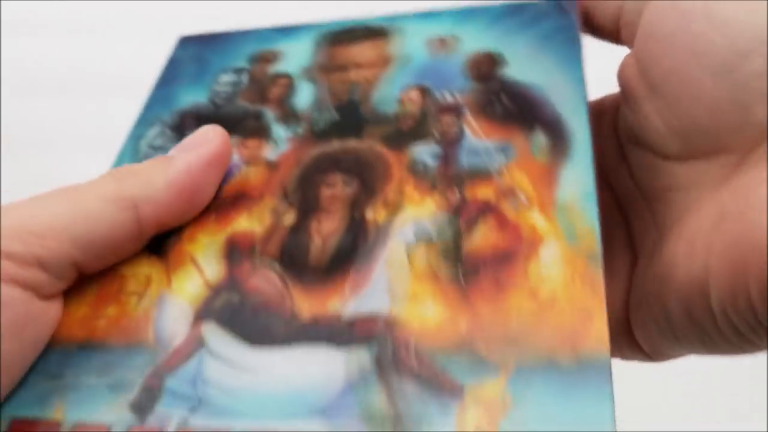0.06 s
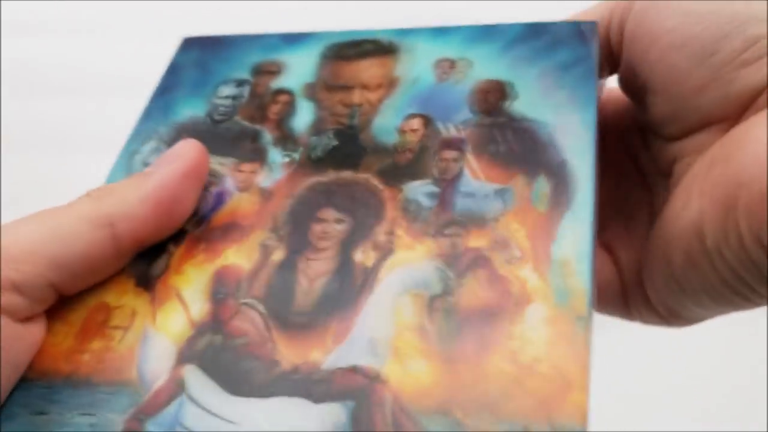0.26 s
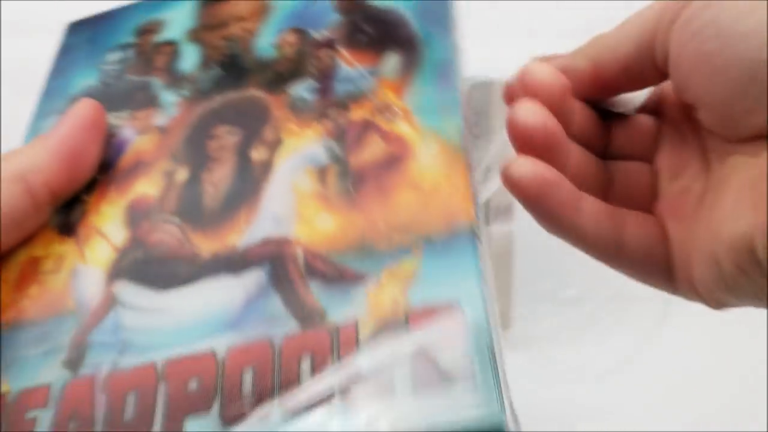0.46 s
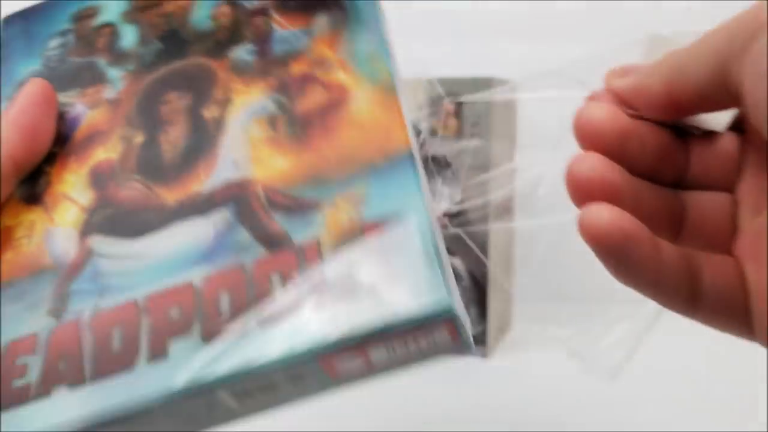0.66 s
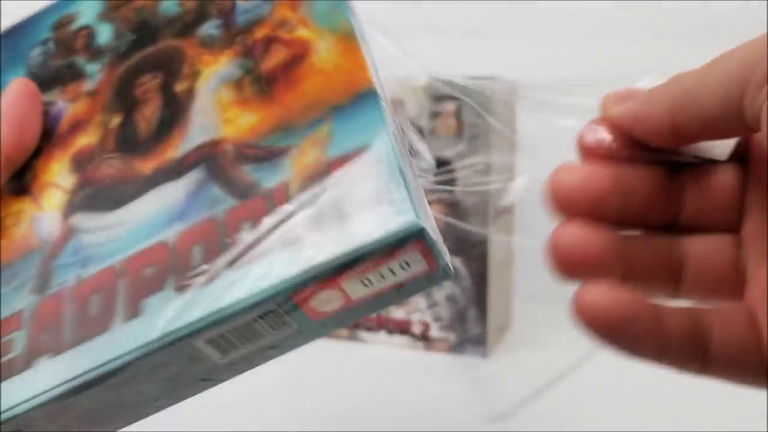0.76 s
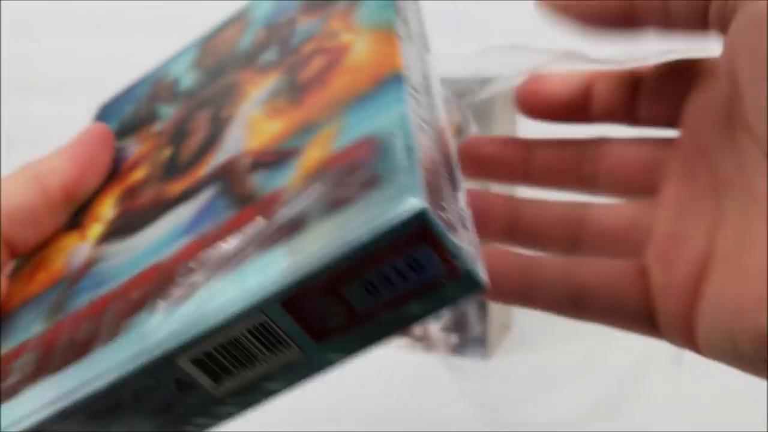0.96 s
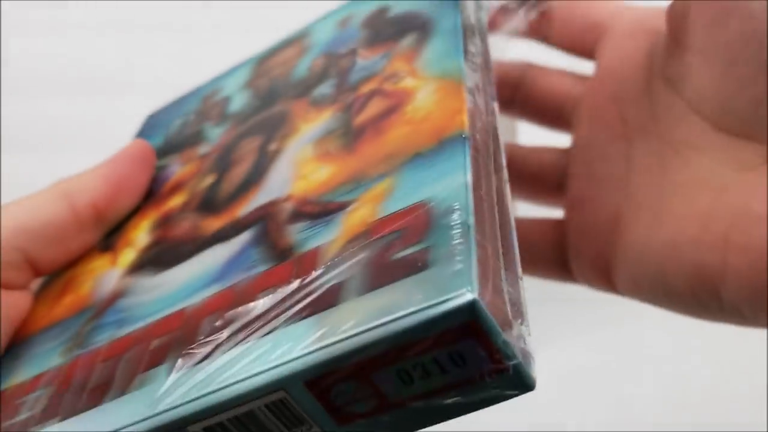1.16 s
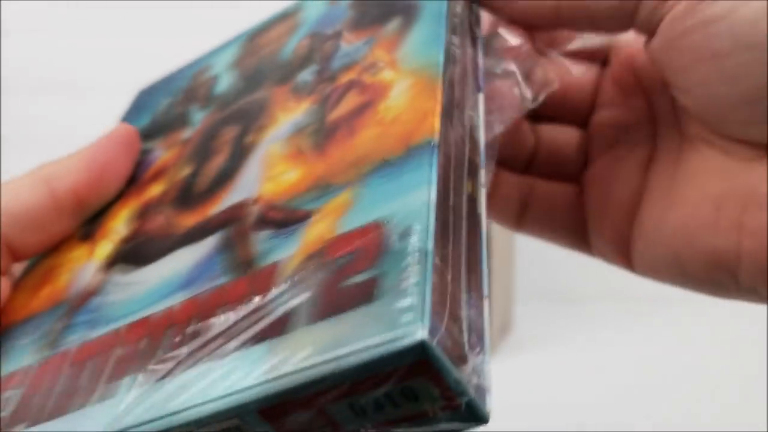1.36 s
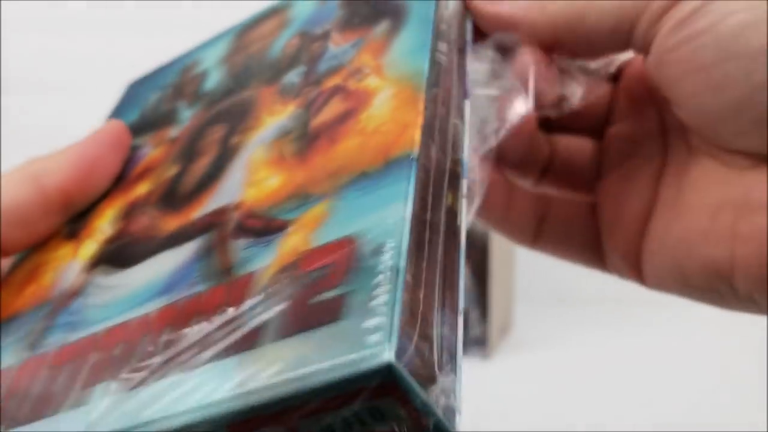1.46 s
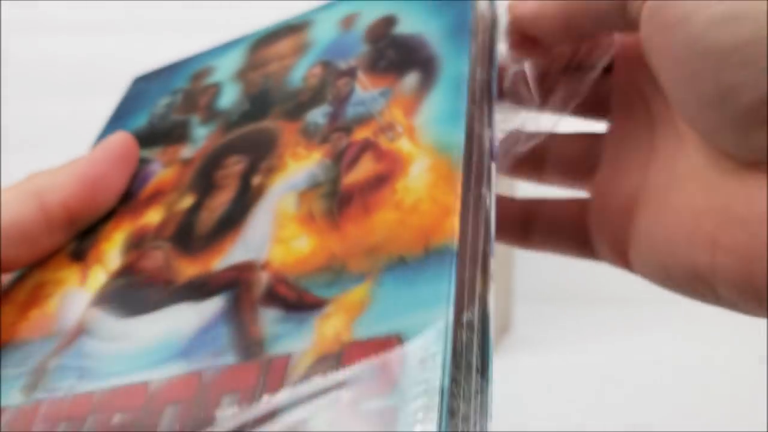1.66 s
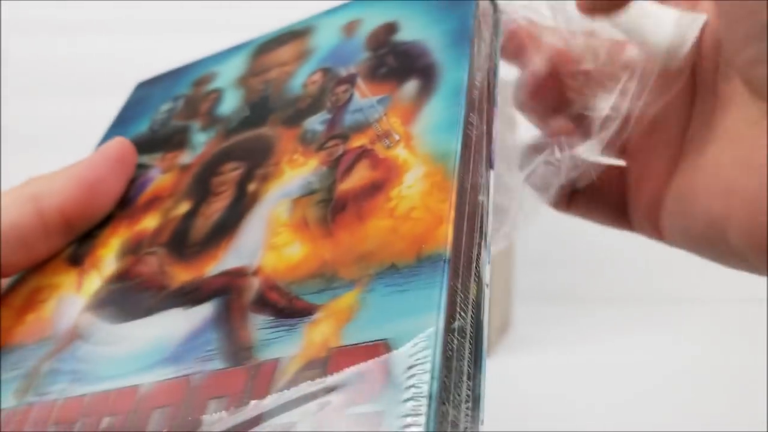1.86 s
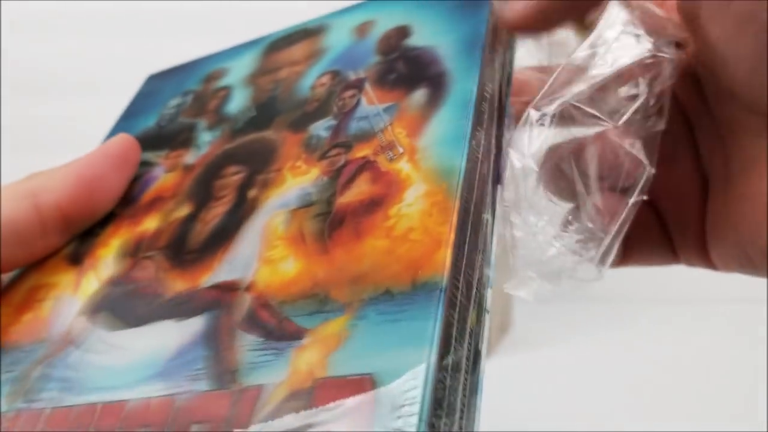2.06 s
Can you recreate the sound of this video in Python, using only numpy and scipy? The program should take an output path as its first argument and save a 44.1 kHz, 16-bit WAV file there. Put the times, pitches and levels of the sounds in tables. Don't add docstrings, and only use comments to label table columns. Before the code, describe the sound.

Thin plastic wrap is peeled from a cardboard box, close in stereo in a small room. Crisp crinkles and ticks grow until 0.33 s; a hard rip crackles at 0.35-0.46 s, then low finger rubbing, and a second, sharper rip at 0.63-0.71 s knocks the box. Sparse, quieter ticks follow until 1.25 s, then livelier snapping peels, with a soft lull near 1.5-1.6 s, continue to 2.1 s over faint hum.

```python
import sys
import numpy as np
from scipy import signal
from scipy.fft import rfft, irfft, next_fast_len
from scipy.io import wavfile
from scipy.ndimage import map_coordinates

SR = 44100
rng = np.random.default_rng(int(sys.argv[2]) if len(sys.argv) > 2 else 0)


def wav_record(signal):
    frames = np.transpose(np.atleast_2d(signal))
    bounded = np.clip(frames, -1, 1)
    quanta = np.round(bounded * 32767).astype(np.int16)
    wavfile.write(sys.argv[1], SR, quanta)


def nominal_scale(level):
    x = np.asarray(level, float) / 20
    return 10 ** x


N = 92610

# (time [s], crinkle level [dB], box drumming over it [dB])
HAND = [(0, -50.5, -37), (.09, -51, -16.5), (.15, -49, -9), (0.301, -43.5, -10), (.5, -60, 12.5),
        (.57, -59.5, -20), (.8, -55, -26), (.9, -58.5, -11), (1.02, -66.5, -14), (1.231, -59.5, -38),
        (1.303, -42.5, -7.5), (1.45, -46.5, -13), (1.562, -63.5, -40), (1.664, -39.5, -15),
        (1.76, -44.5, -9.5), (1.951, -47, -7), (2.02, -57, -14.5), (2.09, -40, -14.5)]
SNAP_T60, SNAP_DB, RING_DB = 0.0089, -7, 4
RISE_S = .0003


def unit(x):
    return x / np.sqrt(np.mean(x ** 2) + 1e-20)


def along(points, hz):
    f, v = np.transpose(points)
    return np.interp(np.log(hz + 1), np.log(f + 1), v)


def filtered(x, response):
    m = next_fast_len(N + 8192)
    hz = np.fft.rfftfreq(m, 1 / SR)
    return irfft(rfft(x, m) * response(hz), m)[..., :N]


def peak(f, hz, width):
    return 1j * f * width / (hz * hz - f * f + 1j * f * width + 1e-9)


def causal(points):
    def response(f):
        cepstrum = irfft(np.log(nominal_scale(along(points, f)) + 1e-6))
        place = np.arange(len(cepstrum))
        fold = np.where(place < len(cepstrum) // 2, 2., 0.) - (place == 0)
        gain = np.exp(rfft(cepstrum * fold))
        return gain / np.sqrt(np.mean(np.abs(gain) ** 2))
    return response


def hum():
    # (frequency [Hz], density [dB per Hz])
    hum_colour = [(12, -23), (20, 4), (116, 2.5), (1030, -24.5), (3840, -2.5), (8890, -18.5), (12100, -13),
                  (16000, -15)]
    noise = rng.standard_normal((2, N))
    return nominal_scale(-70) * unit(filtered(noise, lambda hz: nominal_scale(along(hum_colour, hz))))


def grip():
    # (frequency [Hz], density [dB per Hz])
    grip_colour = [(25, -6), (75, 9.5), (200, 4), (400, -45), (1200, -42)]
    # (time [s], push [dB])
    grip_push = [(0, -73.5), (.41, -75), (.46, -59), (.55, -63.5), (.62, -58), (.75, -64), (.81, -82),
                 (1.24, -80), (1.34, -62), (1.56, -84.5), (1.72, -65), (2.1, -72.5)]
    t = np.arange(N) / SR
    uneven_db = 3 * map_coordinates(rng.standard_normal(80), [t * 30])
    lumps = nominal_scale(np.interp(t, *np.transpose(grip_push)) + uneven_db)
    noise = rng.standard_normal((2, N))
    return nominal_scale(-1) * lumps * unit(filtered(noise, lambda hz: nominal_scale(along(grip_colour, hz))))


def taps():
    # (time [s], peak level [dB], frequency [Hz])
    knocks = [
        (1.698, -48.5, 261),
    ]
    t = np.arange(N) / SR
    out = np.zeros(N)
    for s, db, hz in knocks:
        since = np.maximum(t - s, 0)
        envelope = since * hz * np.exp(1 - since * hz)
        out += nominal_scale(db) * envelope * np.sin(2 * np.pi * hz * since)
    return out


def buckles(rows, t60, ring_db, rise_s, size, kick_db=-40):
    # (frequency [Hz], density [dB per Hz])
    film_colour = [(240, -63), (400, -16.5), (687, -11), (1350, -8.5), (2550, -4), (3530, -2.5),
                   (16000, -2)]
    # (frequency [Hz], width [Hz], level [dB])
    box_modes = [(228, 127, -8.5), (641, 172, -2.5), (1300, 2700, -12.5)]
    ring_q, box_low_hz = 5.4, 124
    ports_apart = np.array([[1], [1j]])

    s, db, hz, box_db = np.transpose(rows)
    draw = rng.standard_normal((len(s), 2, size + 1))
    noise, sign = draw[..., 1:], np.sign(draw[..., :1])
    t, f = np.arange(size) / SR, np.fft.rfftfreq(2 * size, 1 / SR)

    fade_s = t60 * np.exp(0.19 * draw[:, :1, :1])
    shape = nominal_scale(-60 * t / fade_s) * (1 - np.exp(-(t + 1 / SR) / rise_s))
    strength = np.linalg.norm(shape, axis=2, keepdims=True)

    pitch = hz[:, None]
    ring = 1 + nominal_scale(ring_db) * np.sqrt(5000 / pitch) * peak(f, pitch, pitch / ring_q)
    ring = ring[:, None]
    kick = nominal_scale(kick_db) * strength * sign * np.exp(-2j * np.pi * f * rise_s) * ports_apart
    rung = irfft(rfft(noise * shape, 2 * size) * ring + kick * (ring - 1))[..., :size]
    rung = rung * strength / np.linalg.norm(rung, axis=2, keepdims=True)
    push = 0.22 * noise * shape + 3 * sign * np.exp(-t / .00008)

    start = np.clip(np.round(s * SR), 0, N).astype(int)
    at = (start[:, None] + np.arange(size)).ravel()

    def lay(bursts, gain):
        sized = bursts * gain[:, None, None]
        return np.array([np.bincount(at, sized[:, c].ravel(), N + size)[:N] for c in range(2)])

    def drum(f):
        panels = sum((-1) ** k * nominal_scale(d) * peak(f, c, w) for k, (c, w, d) in enumerate(box_modes))
        return ports_apart * (1j * f / (box_low_hz + 1j * f)) ** 2 * panels

    film = filtered(lay(rung, nominal_scale(db)), causal(film_colour))
    return film + filtered(lay(push, nominal_scale(db + box_db)), drum)


def grains(curve, count, spread_db, clump_db, t60):
    s, db, box_db = np.transpose(curve)
    span = s[-1] - s[0]
    u = rng.random((count, 3))
    at = s[0] + span * u[:, 0]
    clump = map_coordinates(rng.standard_normal(200), [at * 60])
    size_db = -spread_db * np.log(u[:, 1] + .004) + clump_db * clump
    size_db = size_db - 10 * np.log10(np.mean(nominal_scale(2 * size_db)) * count / span * t60 / 14)
    pitch = 1500 * 9 ** u[:, 2]
    rows = np.transpose([at, np.interp(at, s, db) + size_db, pitch, np.interp(at, s, box_db)])
    return buckles(rows, t60, ring_db=4.5, rise_s=0.00019, size=160)


def crinkle():
    return grains(HAND, count=6000, spread_db=2.4, clump_db=1.6, t60=.0025)


def followers(snaps, count):
    follow_s, follow_db = .006, -16
    u = rng.random((len(snaps), count, 3))
    lag = -follow_s * np.log(u[..., 0] + 0.012) - 0.28 * follow_s
    weaker_db = follow_db - 8 * u[..., 1]
    rows = snaps[:, None] + np.stack([lag, weaker_db, 0 * lag, 0 * lag - 3], axis=-1)
    rows[..., 2] = np.clip(rows[..., 2] * 3 ** (2 * u[..., 2] - 1), 800, 14000)
    return rows.reshape(-1, 4)


def small_snaps():
    # (time [s], peak level [dB], film ring [Hz])
    early = [(0.0437, -33, 12200), (0.0475, -36, 7350), (0.0677, -30, 12400), (0.0764, -35, 5050),
             (0.0817, -35, 4580), (0.0993, -25.5, 4480), (0.1071, -22.5, 4030), (0.1457, -25.5, 4100),
             (0.1475, -23, 1510), (0.1658, -40, 4040), (0.1754, -32, 12400), (0.1902, -33.0, 7800),
             (0.1987, -30, 6500), (0.2108, -37, 7500), (0.2213, -24.5, 5450), (0.2371, -21, 9800),
             (0.2417, -23, 7850), (0.2482, -28, 4415), (0.2671, -25.0, 7500), (0.2763, -23.5, 10300),
             (0.2808, -32, 7500), (0.2845, -20, 1520), (0.3004, -33, 12100), (0.3098, -31, 3600),
             (0.315, -23, 800), (0.3181, -27, 7500), (0.3306, -21.5, 7600), (0.7703, -30, 6540),
             (0.7956, -32.0, 12330), (0.8112, -36.5, 6100), (0.8178, -34.5, 4600), (0.8225, -35, 4570),
             (0.8311, -42, 7400), (0.8512, -38.0, 4270), (0.8637, -28, 12700), (0.8764, -53, 6400),
             (0.8828, -44, 5600), (0.8866, -43, 7700), (0.8916, -21.5, 13200), (0.9122, -28, 2500),
             (0.9261, -32, 7400), (0.9413, -21.5, 7100), (0.9699, -46, 6500), (0.9879, -22.5, 14310),
             (1.0433, -41, 8300), (1.0566, -35.0, 10200), (1.0666, -31.5, 4660), (1.085, -44.0, 5100),
             (1.089, -32.5, 7560), (1.1074, -38, 7400), (1.1119, -39, 7140), (1.1507, -35, 7000),
             (1.1545, -32, 6900), (1.1638, -31, 7100), (1.1707, -41, 4360), (1.181, -38, 4300),
             (1.1967, -40, 7300), (1.2069, -42.0, 5000), (1.2304, -42, 7300), (1.2565, -30.5, 6794)]
    # (time [s], peak level [dB], film ring [Hz])
    late = [(1.286, -26.0, 13000), (1.2959, -27.0, 3600), (1.3166, -22, 4000), (1.3344, -30, 3900),
            (1.3506, -29.5, 6650), (1.3746, -26.5, 6900), (1.3835, -26.0, 6500), (1.3953, -21, 1900),
            (1.4153, -24, 1930), (1.423, -32, 14900), (1.4284, -26.0, 7700), (1.4395, -18, 1820),
            (1.4556, -35, 7400), (1.4752, -36, 4200), (1.479, -24.5, 7550), (1.5016, -45, 5800),
            (1.518, -31, 7100), (1.5336, -34.5, 2480), (1.541, -43, 7200), (1.552, -35.5, 4250),
            (1.568, -35, 6260), (1.5795, -38, 11900), (1.5856, -43, 7100), (1.5976, -46, 1900),
            (1.6076, -29, 7160), (1.619, -41, 7500), (1.6338, -35, 12700), (1.6386, -34, 12400),
            (1.6444, -34, 7900), (1.6526, -19.5, 7200), (1.6577, -21.5, 12500), (1.6733, -27, 12100),
            (1.7021, -18.5, 3600), (1.7074, -27, 6100), (1.7442, -28, 7500), (1.7514, -18, 12300),
            (1.755, -21.5, 10400), (1.781, -33, 4600), (1.7879, -28.5, 12700), (1.802, -27.0, 3600),
            (1.8093, -21, 3300), (1.8445, -19.5, 10700), (1.8597, -27, 7200), (1.884, -34, 7504),
            (1.8894, -40, 7000), (1.9028, -23.5, 3000), (1.915, -33, 6760), (1.9274, -31, 10100),
            (1.9384, -21, 4200), (1.9703, -25.5, 2930), (1.9748, -25.5, 2530), (1.9794, -24, 6600),
            (2.0132, -27.5, 7600), (2.0324, -37.0, 3800), (2.039, -37, 6600), (2.045, -27.5, 12600),
            (2.0541, -30.5, 4200), (2.0696, -24.5, 12900), (2.084, -27.5, 7900), (2.0934, -25, 12500)]
    lead_s, box_less_db, low_hz = .0008, -0.5, 1170
    small = np.concatenate([early, late])
    s, _, box_db = np.transpose(HAND)
    drumming = np.interp(small[:, 0], s, box_db) + box_less_db
    small = np.column_stack([small, drumming]) + [lead_s, SNAP_DB, 0, 0]
    crowd = buckles(followers(small, count=4), 0.0048, RING_DB, 0.00018, size=256)
    ticks = buckles(small, SNAP_T60, 2.5, RISE_S, size=768, kick_db=0)
    return filtered(ticks, lambda f: 1j * f / (low_hz + 1j * f)) + crowd


def rips():
    # (time [s], rip level [dB])
    pulls = [
        [(.34, -46), (.37, -38), (.42, -44), (.455, -35), (.475, -70), (.51, -51.5), (.55, -99)],
        [(.565, -56), (.6, -56), (.622, -71), (.63, -31.5), (.675, -29.5), (.7, -55), (.716, -40), (.76, -79)],
    ]
    # (time [s], peak level [dB], film ring [Hz], box drumming over it [dB])
    rip_snaps = [(0.3468, -22, 12100, -17), (0.3526, -26, 1900, -21), (.3591, -19, 6140, -11),
                 (0.3698, -15, 1490, 0), (0.3805, -5.5, 1790, -8.5), (0.39, -4, 1740, -10.5),
                 (0.4003, -20, 2300, -22), (0.4104, -8, 1710, 0), (0.4185, -8.5, 4070, 0.5),
                 (0.4238, -14, 5800, -15), (0.4323, -14.5, 4470, -14), (0.4348, -11.5, 2070, 4),
                 (0.441, -22, 4800, -20), (0.443, -14.5, 5400, -16), (0.444, -7.5, 1960, -3),
                 (.451, -16.5, 3800, 5.5), (.457, -17, 4350, 5), (.5713, -41.5, 849, 16),
                 (0.5777, -38, 4620, 13.5), (0.5826, -41, 1100, 15), (0.598, -25, 890, 11.5),
                 (0.6023, -30.5, 860, 11), (0.626, -7.5, 1350, 5.5), (0.6279, -4.5, 7800, -4),
                 (0.6444, -7, 4700, -27), (0.6558, -10.5, 6350, 0.5), (0.6654, -12, 6900, -13),
                 (0.6738, -13, 6560, -6), (.7063, -4, 6350, -5), (0.7071, -9.5, 2620, -9.5),
                 (0.7111, -10, 5360, -12)]
    rush = np.zeros((2, N))
    for pull in pulls:
        curve = [(s, db, -9) for s, db in pull]
        rush += grains(curve, count=500, spread_db=2.6, clump_db=1.5, t60=.003)
    big = np.array(rip_snaps) + [0, SNAP_DB, 0, 0]
    return rush + buckles(big, SNAP_T60, RING_DB, RISE_S, size=768, kick_db=5.5)


def room(x):
    # (frequency [Hz], fade by 60 dB [s])
    room_fade = [(200, 0.17), (2000, 0.14), (12000, 0.14)]
    room_db, table_db, table_t60 = -6.5, -10.5, 0.015
    delay = 60
    out, part = np.zeros((2, N + SR)), SR // 20
    for a in range(0, N, part):
        hz, t, z = signal.stft(rng.standard_normal((2, SR // 3)), SR, nperseg=256)
        fade = nominal_scale(-60 * t / along(room_fade, hz)[:, None])
        tail = signal.istft(z * fade, SR, nperseg=256)[1]
        near_fade = nominal_scale(-60 * np.arange(tail.shape[1]) / SR / table_t60)
        near = rng.standard_normal(tail.shape) * near_fade
        walls = nominal_scale(room_db) * tail / np.linalg.norm(tail[0])
        table = nominal_scale(table_db) * near / np.linalg.norm(near[0])
        wet = signal.fftconvolve(x[:, a:a + part], walls + table, axes=1)
        out[:, a + delay:a + delay + wet.shape[1]] += wet
    return out[:, :N]


def ports(pair):
    # (frequency [Hz], likeness from -1 to 1)
    alike = [(200, .92), (1400, .78), (3000, .2), (9500, -.25)]
    # (frequency [Hz], left over right [dB])
    lean = [(100, .3), (1200, 2.5), (5000, 2), (9500, -1.2)]

    def share(hz):
        angle = np.arccos(np.clip(along(alike, hz), -1, 1)) / 2
        return np.array([np.cos(angle), np.sin(angle)])

    mid, side = filtered(pair, share)
    left_right = np.array([mid + side, mid - side])
    return filtered(left_right, lambda hz: nominal_scale(along(lean, hz) / 2 * np.array([[1], [-1]])))


def scene():
    film = crinkle() + small_snaps() + rips() + taps()
    return ports(film + room(film) + grip() + hum())


def top_cut(x):
    return signal.sosfilt(signal.butter(12, 17000, fs=SR, output="sos"), x)


def record(dry):
    # (frequency [Hz], level [dB])
    mic_colour = [(7000, 0.5), (9000, -2), (11500, 3.5), (15600, 1.5), (16100, -32), (16800, -32)]
    top_hz = 16800
    mix = filtered(dry, lambda hz: nominal_scale(along(mic_colour, hz)) * (hz < top_hz))
    return top_cut(mix)


dry = scene()
out = record(dry)
wav_record(out)
```